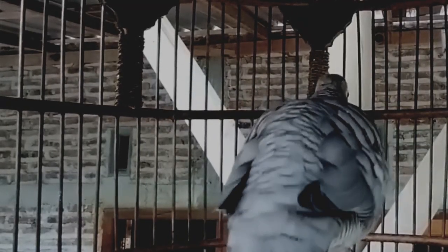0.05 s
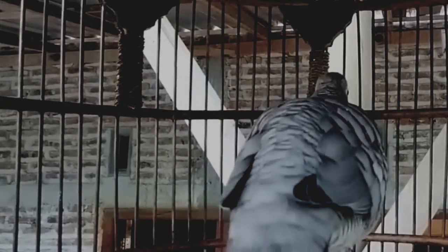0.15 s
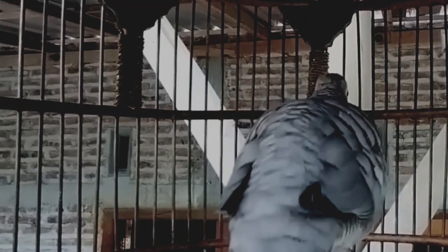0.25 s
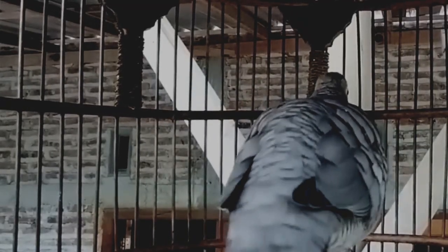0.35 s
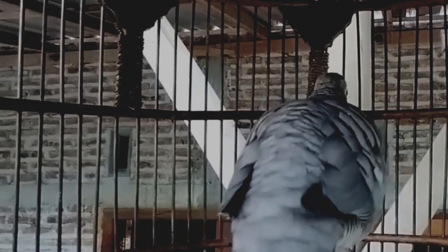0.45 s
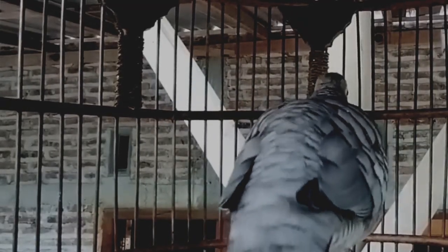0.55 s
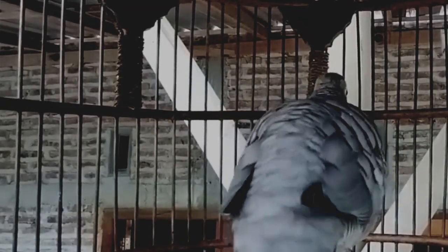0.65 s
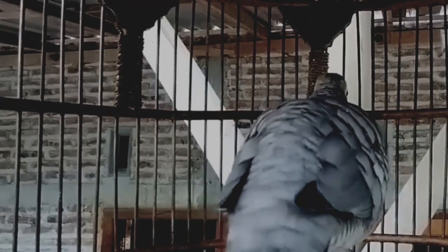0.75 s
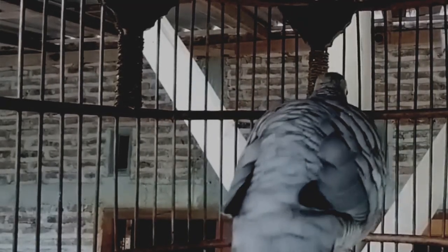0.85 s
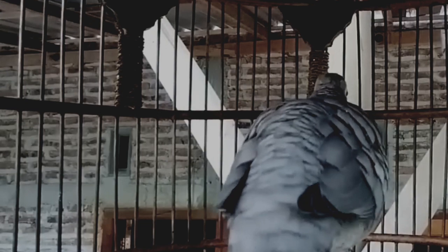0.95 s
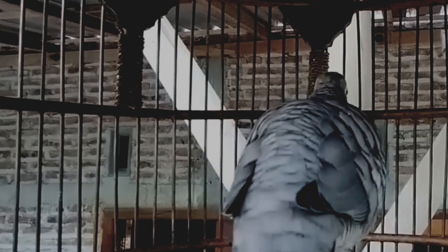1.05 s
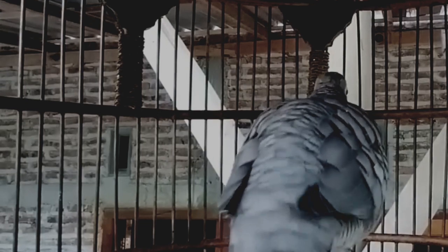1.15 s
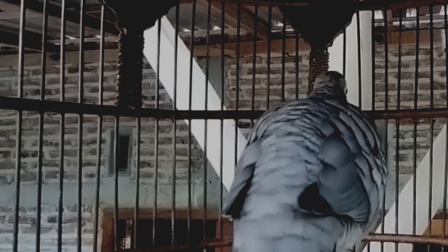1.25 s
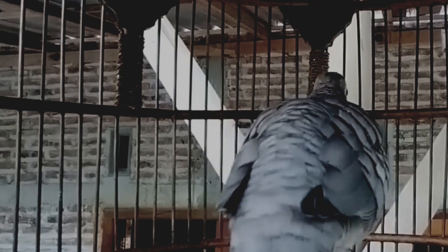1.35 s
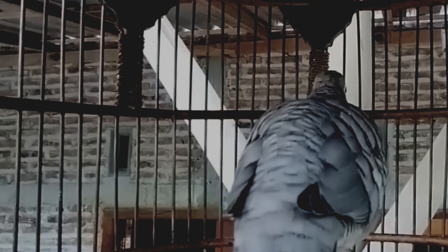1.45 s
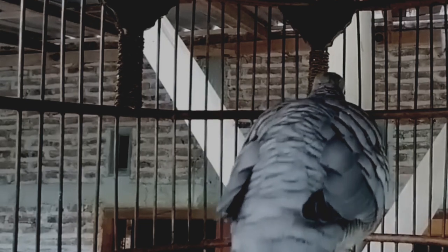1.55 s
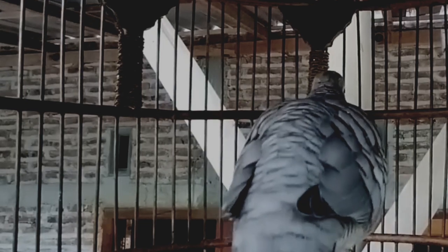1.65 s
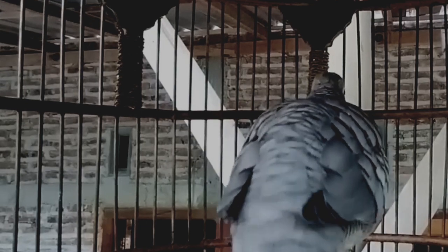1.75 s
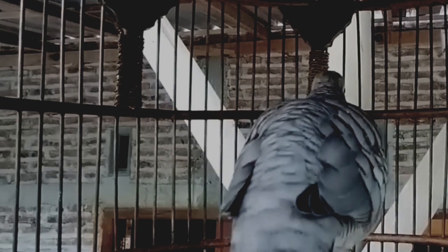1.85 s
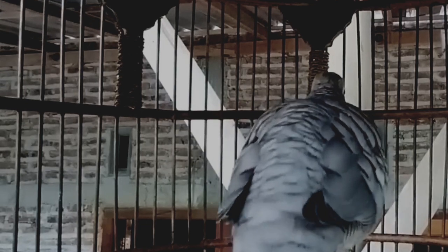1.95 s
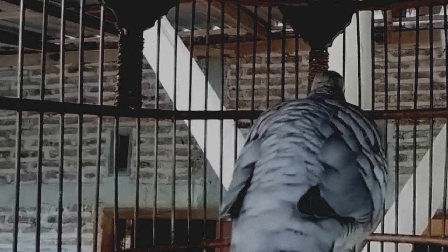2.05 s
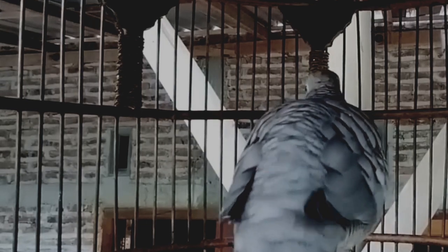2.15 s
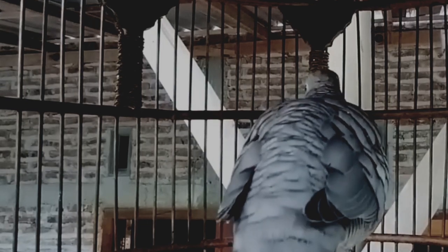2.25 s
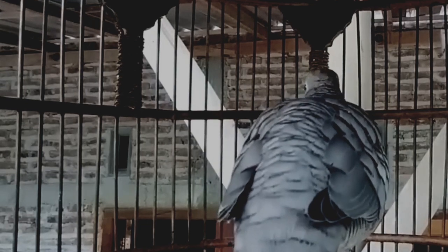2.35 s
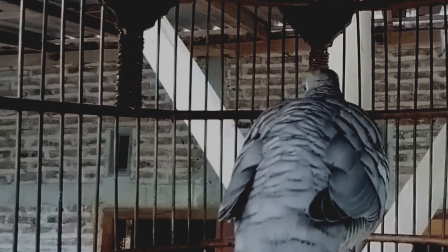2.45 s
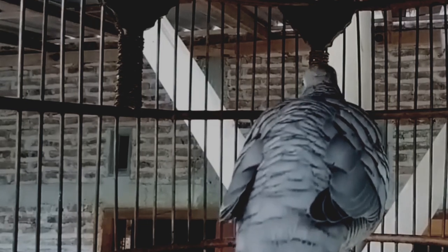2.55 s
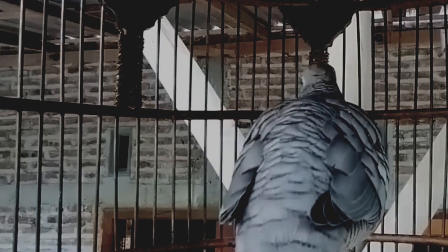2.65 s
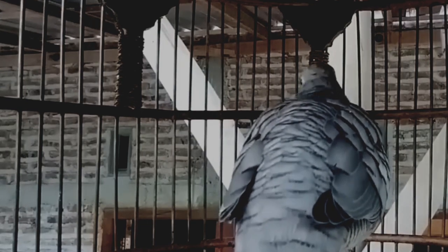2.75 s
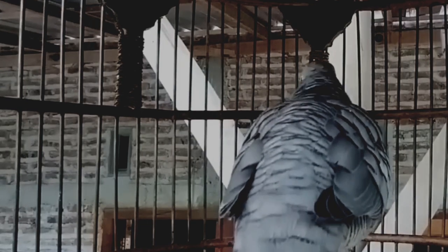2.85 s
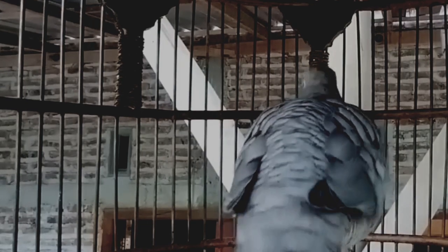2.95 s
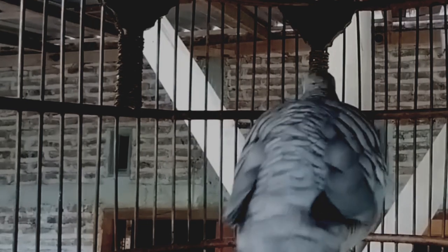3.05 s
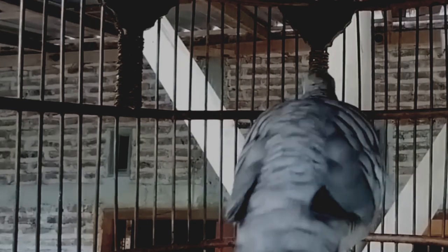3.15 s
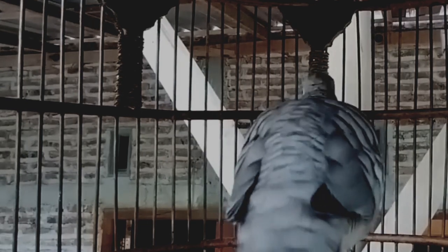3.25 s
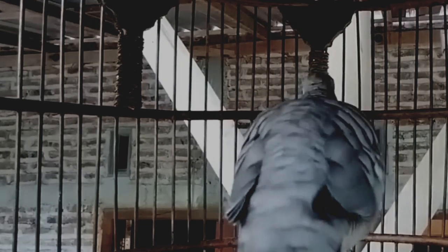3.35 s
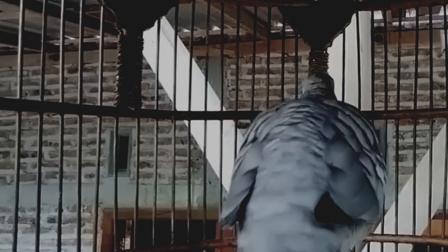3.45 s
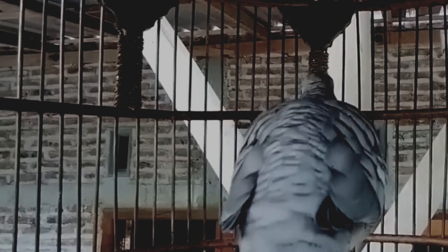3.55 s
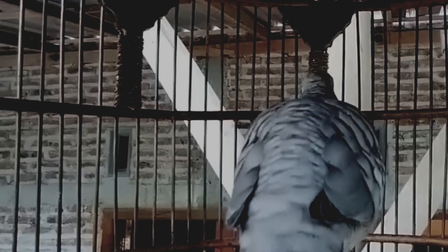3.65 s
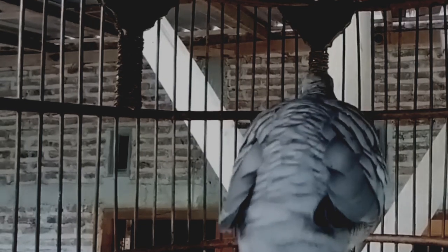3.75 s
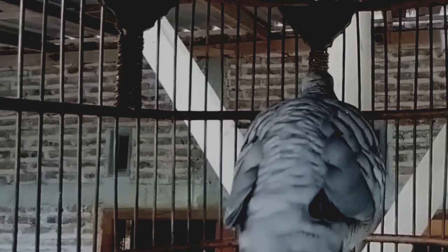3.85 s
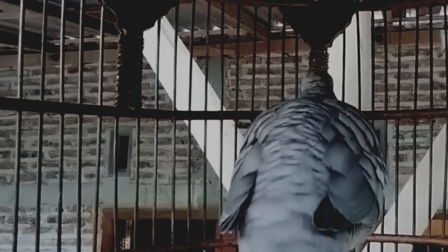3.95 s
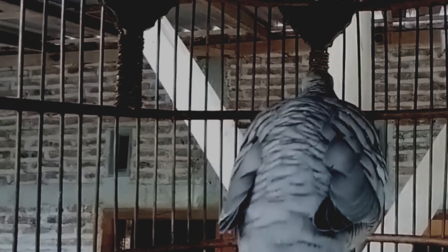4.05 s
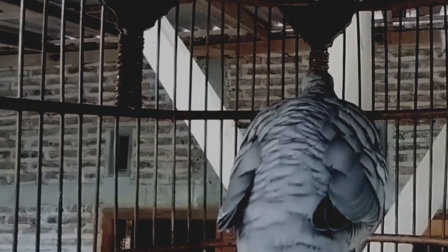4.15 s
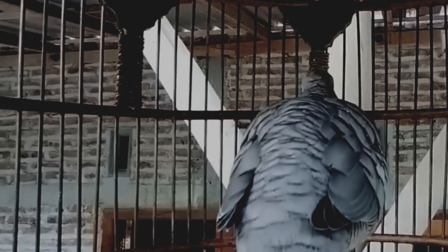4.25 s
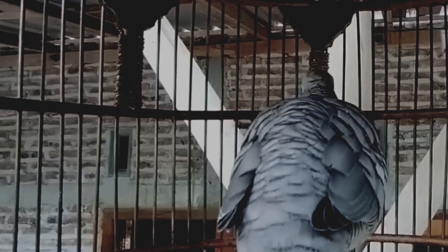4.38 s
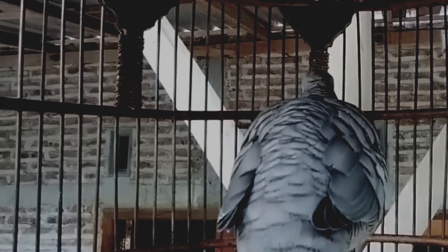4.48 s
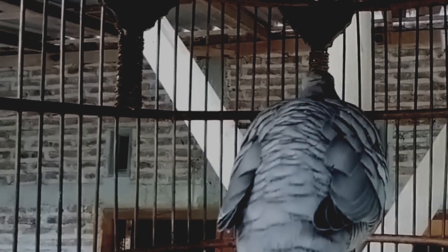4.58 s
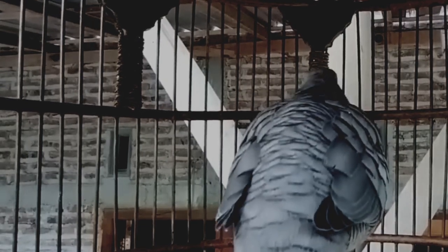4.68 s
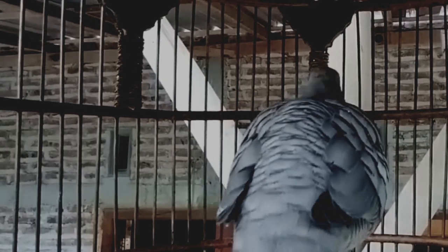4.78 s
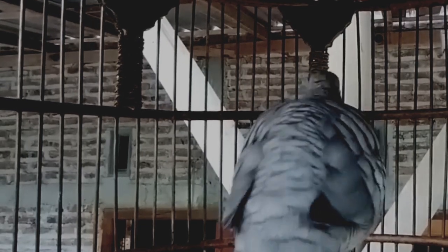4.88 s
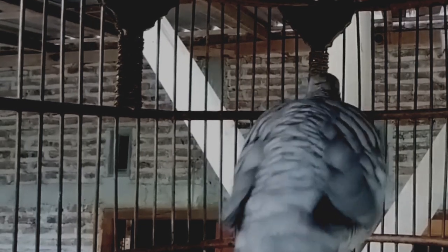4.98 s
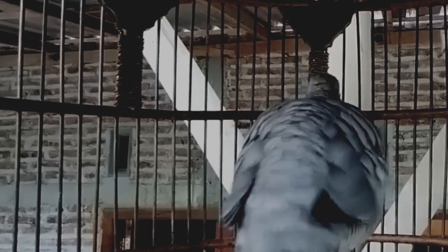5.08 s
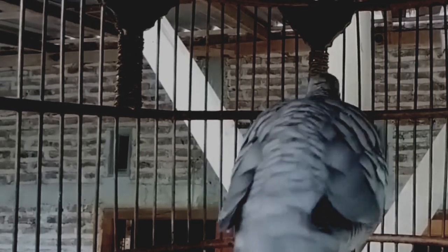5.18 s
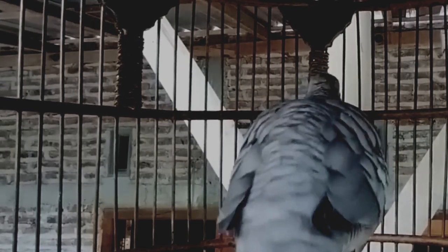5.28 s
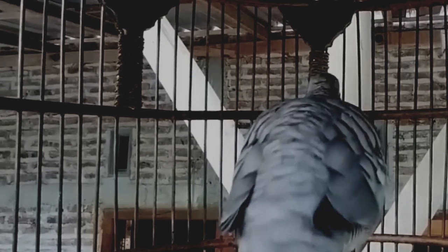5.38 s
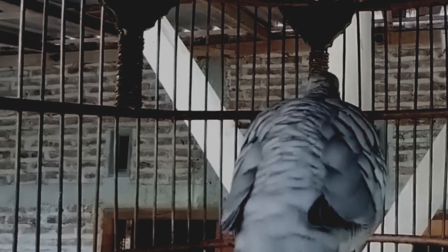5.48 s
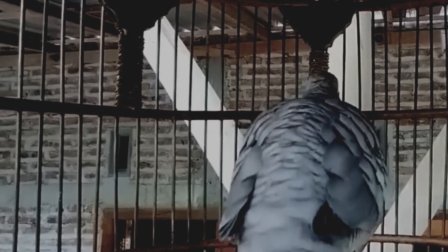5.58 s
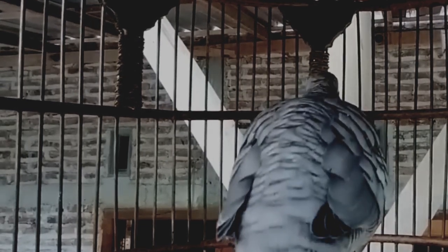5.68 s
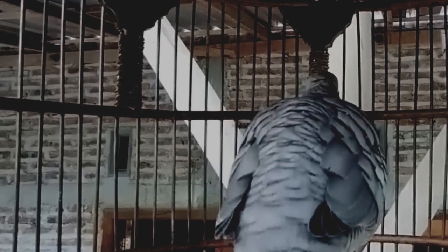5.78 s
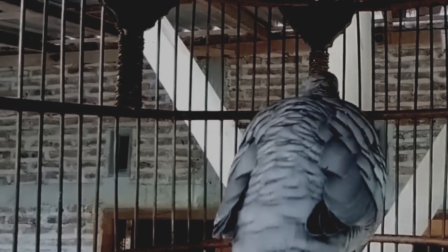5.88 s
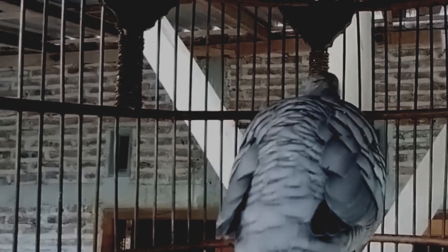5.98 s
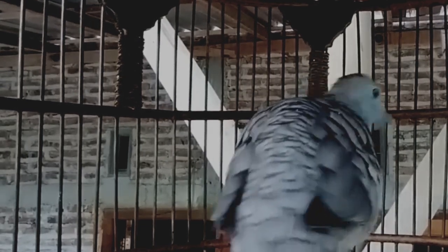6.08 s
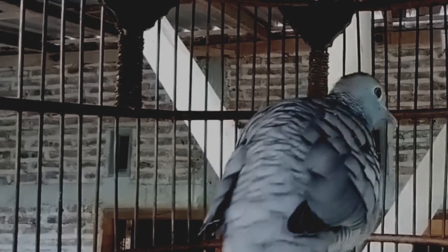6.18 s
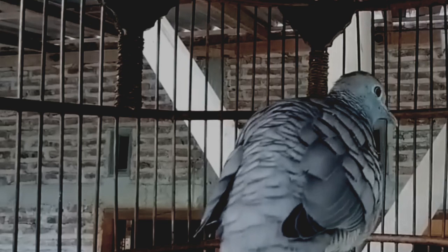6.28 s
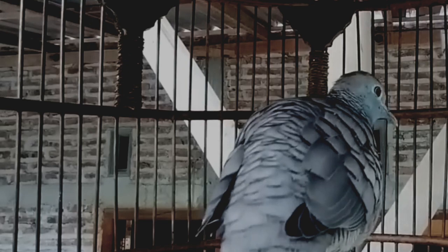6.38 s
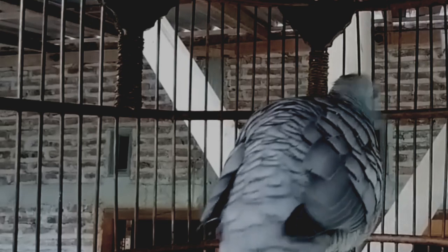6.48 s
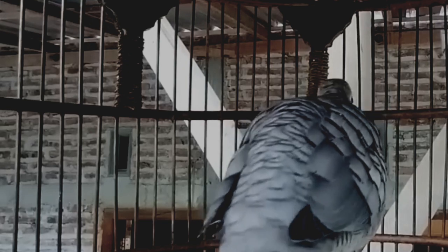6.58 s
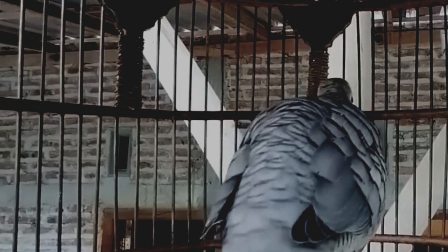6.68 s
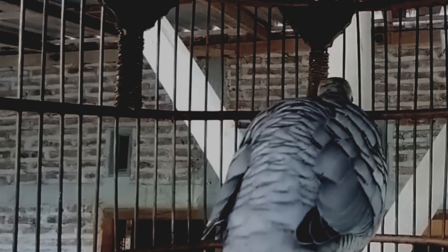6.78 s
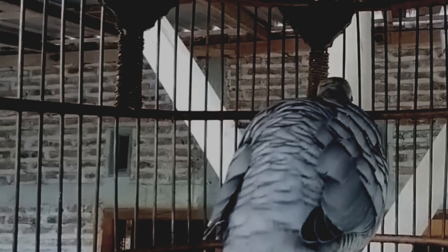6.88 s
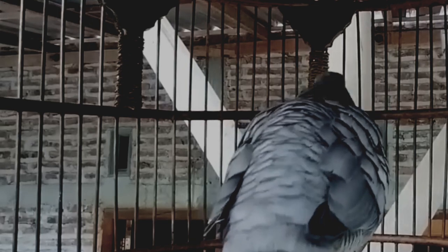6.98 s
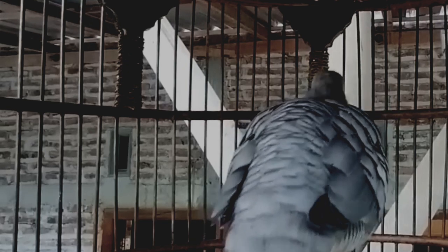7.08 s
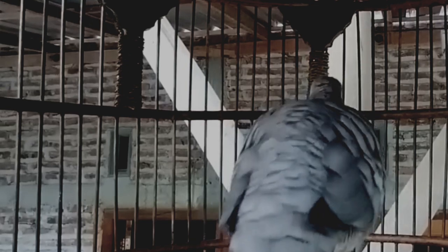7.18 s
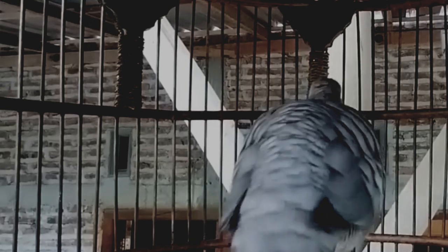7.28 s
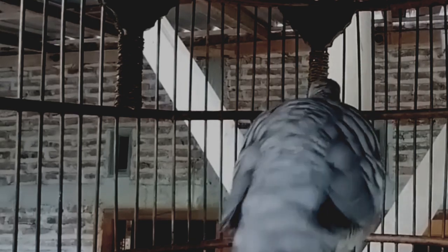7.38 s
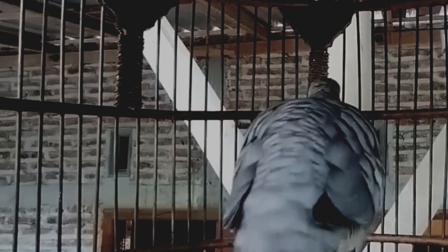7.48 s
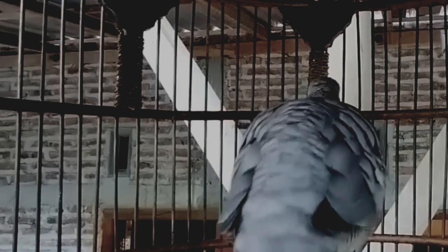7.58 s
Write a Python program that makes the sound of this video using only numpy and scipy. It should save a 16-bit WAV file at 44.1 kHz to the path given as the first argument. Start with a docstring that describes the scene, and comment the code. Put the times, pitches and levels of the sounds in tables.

```python
"""Zebra dove on a porch

A caged zebra dove coos close by, on a brick-walled porch: each coo slides up in a low register, then breaks
to a high one. Most start with a rasp of filtered puffs; delayed copies make the wall echoes.
Gliding sines chirp and whistle farther off; shaped noise gives a low outdoor rumble, hiss and insect-like trill."""
import sys
import numpy as np
from scipy import signal
from scipy.fft import rfft, irfft, next_fast_len
from scipy.io import wavfile
from scipy.ndimage import uniform_filter1d, minimum_filter1d

SR = 44100
rng = np.random.default_rng(int(sys.argv[2]) if len(sys.argv) > 2 else 0)


def wav_out(sig):
    """Save sig, one row per channel (or a flat mono array), as 16-bit PCM at SR to the path in sys.argv[1]."""
    wavfile.write(sys.argv[1], SR, np.round(np.clip(np.atleast_2d(sig).T, -1, 1) * 32767).astype(np.int16))


N = 336483
TIME_S = np.arange(N) / SR

# Slow phrase of long coos: register break t/s, hold/s
SLOW_COOS = [(.112, 0.083), (.312, 0.087), (0.517, 0.088), (0.727, 0.084), (.938, 0.086), (1.152, 0.086),
             (1.37, 0.086), (1.591, 0.087), (1.826, 0.069), (2.03, 0.079), (2.243, .089)]
SLOW_TOP_HZ, SLOW_SINK_HZ = 1214.6, 40.13
SLOW_PEAK_DB, SLOW_ARCH_DB = -1.2, 6.5
SLOW_SLIDE_S, SLOW_SLIDE_GROWTH_S, SLOW_RASP_S = .023, .01, .013
SLOW_LOW_REGISTER = .805  # pitch under the break / top pitch
SLOW_FADE_S, SLOW_LAST_FADE_S = .016, .055
# Trills: list of register breaks t/s, pitch offset/Hz, quaver depth of long notes/0-1
TRILLS = [([3.128, 3.182, 3.237, 3.324, 3.421, 3.530, 3.650, 3.800, 3.998], 0, 0.73),
          ([4.981, 5.031, 5.082, 5.155, 5.256, 5.366, 5.491, 5.638], 1, .1),
          ([7.294, 7.335, 7.381, 7.442, 7.541], 26, 0)]
# Course of every trill: t into trill/s, slide/s, hold/s, fade/s, top f/Hz, level/dB, rasp/s
TRILL_COURSE = [(0, .024, .035, .031, 1206, -2, .024), (.05, .012, 0.033, .026, 1188, -5, .005),
                (0.177, .014, .033, 0.032, 1145, -4, .008), (.52, .021, 0.046, .045, 1164, -3.5, .011),
                (0.661, .023, .098, .08, 1166, -4, .016)]
TRILL_LOW_HZ = 970.2  # under the break, before the trill's offset
QUAVER_PER_S = 24
# Soft coos without rasp: register break t/s, slide/s, hold/s, top f/Hz
SOFT_COOS = [(0.219, .028, .075, 1228), (4.156, .027, .041, 1253), (4.346, 0.048, 0.062, 1272)]
SOFT_DB, SOFT_LOW_REGISTER, SOFT_FADE_S = -13.5, .885, .009
# Low-register slide: t before the break/slide length, f/pitch under the break
SLIDE = [(-.3, 1.3), (0, 1.04), (.15, 0.995), (.5, 0.9817), (.8, 0.9244), (1, 0.842), (1.3, .52)]
# High-register overtones: multiple of f, level/dB
OVERTONES = [(3, -44.5), (4, -52.5), (5, -46.5), (6, -53.5)]
# Soft short notes, pitch a parabola: t/s, length/s, start f/Hz, middle f/Hz, end f/Hz
MURMURS = [(.420, 0.038, 960, 1161, 1046), (3.732, 0.073, 967, 1112, 1165), (3.935, 0.029, 993, 1106, 1105),
           (7.469, 0.02, 1160, 1268, 1315), (7.487, .04, 1098, 1140, 1206), (7.614, .04, 980, 1080, 1070)]
# Soft throat clicks before a trill: t/s
CLICKS_S = [3.039, 4.899, 7.205]
# Hiss that follows the coo's loudness: f/Hz, relative level/dB per Hz
HISS_WITH_COO = [(1500, -1.5), (2500, 1.5), (3400, -1), (4500, -6.5), (6200, -1), (8000, -10), (11000, -14),
                 (15000, -12)]
# Near walls: delay/s, left gain, right gain (negative inverts the wave)
WALLS = [(.00196, -.28, -.05), (.00391, .15, -.12), (.00464, -.05, -.13), (.00963, .2, -.03),
         (.0102, -.01, .19), (.0162, -.15, -.23), (.0166, -.03, -.11), (.0357, -0.029, -.09),
         (.0386, -.07, -.07)]

# Tick: t/s, level of the noise before its band-pass/dB
TICK = (5.129, -30)

# Glide shapes, whistle (short step, then sweep up), chirp, peep, arch: t into call/s, f/Hz, relative level/dB
WHISTLE_SHAPE = [(0, 4300, -21.5), (.022, 4970, -10.5), (.038, 5080, -22.5), (.05, 5250, -11),
                 (.11, 5575, -8.5), (.15, 6400, -1.5), (.175, 7140, -5.5), (.2, 7506, -11.5),
                 (.21, 7570, -38.5)]
CHIRP_SHAPE = [(0, 3599, -15), (.008, 4596, -2), (.016, 4810, 0.5), (.05, 4800, -2), (.056, 3835, -13),
               (.075, 3150, 0.5), (.105, 2680, -1), (.13, 2502, -19)]
PEEP_SHAPE = [(0, 2489, -17.5), (.02, 2661, 3.5), (.04, 2780, -2.5), (.06, 2680, -22.5)]
ARCH_SHAPE = [(0, 2720, -13.5), (.03, 3240, -4.5), (.06, 3530, 0), (.1, 3100, -1), (.12, 2890, -17)]
# The whistler's calls: t/s, level/dB
WHISTLES = [(0.093, -34.5), (4.234, -35.5), (6.825, -38)]
# Bouts of steady chirps: first t/s, last t/s
CHIRP_BOUTS = [(.45, 1.559), (1.775, 3.615), (3.985, 5.135), (5.491, 7.315)]
CHIRP_EVERY_S, CHIRP_DB = .37, -51  # approximate spacing
# Peeps: t/s
PEEP_TIMES_S = [2.67, 2.73, 3.03, 5.79, 6.255, 6.718]
PEEP_DB = -48.5
# Arched calls: t/s
ARCH_TIMES_S = [.05, .72, 2.675, 3.09, 4.57, 6.05, 6.511, 6.98]
ARCH_DB = -53.5
# Hoarse chips: centre t/s, half-length/s, level/dB
CHIPS = [(2.384, 0.089, -51), (2.88, 0.037, -42.5), (3.68, 0.083, -51.5), (4.224, 0.077, -52),
         (6.469, .12, -55.5)]

# One far hoot: t/s, f/Hz, level/dB
HOOT = [(2.1, 592, -61), (2.3, 623, -48), (2.45, 640, -40.5), (2.6, 625, -56), (2.72, 604, -67)]
# Another dove answers far away: t/s, f/Hz, level/dB
ANSWER = [(6.575, 948, -49), (6.62, 1205, -45), (6.72, 1165, -51), (6.79, 1100, -45), (6.81, 1038, -66),
          (6.835, 1025, -40), (6.86, 988, -71), (6.885, 1000, -48), (6.92, 980, -70), (6.955, 998, -49.5),
          (7.0, 1010, -68), (7.05, 1127, -43.5), (7.1, 987, -66)]
# Outdoor rumble: f/Hz, relative level/dB per Hz
RUMBLE_SPECTRUM = [(22, -9), (40, -4.5), (58, -3), (78, -0.5), (112, -10.5), (200, -13.5), (300, -14),
                   (400, -19.5), (500, -25), (650, -27), (850, -32.5), (1150, -32.5), (1400, -38.5),
                   (2000, -42.5), (2600, -53.5)]
RUMBLE_DB = -36.5
# Outdoor hiss: f/Hz, relative level/dB per Hz
HISS_SPECTRUM = [(1500, -4), (2200, 2), (3200, 1), (4200, -0.5), (6300, -2), (7500, -7), (9500, 1),
                 (10400, -6.5), (11300, -16), (13000, -8), (15500, -12.5)]
# Stereo noise: f/Hz, left-right likeness
LIKENESS = [(30, 0.22), (70, .94), (250, 0.88), (900, 0.6), (2200, 0), (15000, 0.021)]
CUTOFF_HZ = 15500


def dove(voice_db=-3, murmur_db=-11.5, rasp_db=24.0, click_db=3, low_octave_db=-40, high_octave_db=-48.5,
         hiss_with_coo_db=-50, ear_lag_s=.00018):
    """Nearly pure notes from an inflated throat, with faint overtones and hiss, echoed by the porch."""
    tone, overtones, puffs, coo_loudness = np.zeros((4, N))
    for s, slide_s, rasp_s, db, (lead_s, phase, loud) in [*slow_phrase(), *trills(), *soft_coos()]:
        loud = loud * from_db(db)
        size = loud.shape[1]
        # octave strongest in the low register
        octave = from_db(np.array([[low_octave_db], [high_octave_db]]) + 2.7 * drift(120, size))
        voiced = np.sin(phase) + octave * np.sin(2 * phase)
        add(tone, s + lead_s, np.sum(loud * voiced, axis=0))
        series = sum(from_db(level_db + 3.4 * drift(170, size)) * np.sin(multiple * phase[1])
                     for multiple, level_db in OVERTONES)
        # overtones grow faster than the note's loudness
        add(overtones, s + lead_s, loud[1] ** 1.3 * series)
        add(coo_loudness, s + lead_s, loud.sum(axis=0))
        if rasp_s > 0:
            add(puffs, s - slide_s - rasp_s, from_db(db + rasp_db) * rasp(rasp_s + .002))
    for s, length_s, start_hz, middle_hz, end_hz in MURMURS:
        add(tone, s, from_db(murmur_db) * murmur(length_s, start_hz, middle_hz, end_hz))
    for s in CLICKS_S:
        add(puffs, s, from_db([click_db]))
    # puffs ring in the closed throat
    throat = band(band(puffs, 870, 1400, order=1), 480, 1385, order=5)
    voice = from_db(voice_db) * (tone + throat)
    near = voice * from_db([[1.1], [-1.2]]) + wall_echoes(voice)
    bright = np.array([overtones, delayed(overtones, ear_lag_s)])
    porch = from_db(-18.5) * reverb(band(voice, 850, 1060), t60_s=0.6)
    porch = porch + from_db(-26.0) * reverb(voice, t60_s=0.2)
    hiss = from_db(hiss_with_coo_db) * coo_loudness * noise(HISS_WITH_COO)
    return near + bright + porch + hiss


def slow_phrase():
    """As the bird tires, coos sink, slide longer, fade longer. Yields (s, slide s, rasp s, dB, note)."""
    for (s, hold_s), tired in zip(SLOW_COOS, np.linspace(0, 1, len(SLOW_COOS))):
        top_hz = SLOW_TOP_HZ - SLOW_SINK_HZ * tired ** 2.6
        slide_s = SLOW_SLIDE_S + SLOW_SLIDE_GROWTH_S * tired
        fade_s = SLOW_FADE_S + (SLOW_LAST_FADE_S - SLOW_FADE_S) * tired ** 4.7
        db = SLOW_PEAK_DB - SLOW_ARCH_DB * (tired - .47) ** 2  # loudest near the middle
        yield s, slide_s, SLOW_RASP_S, db, coo(slide_s, hold_s, fade_s, SLOW_LOW_REGISTER * top_hz, top_hz)


def trills():
    """Each note takes its shape from how far into the trill it falls; long notes may quaver."""
    ages_s, *columns = np.transpose(TRILL_COURSE)
    for times_s, offset_hz, quaver in TRILLS:
        for s in times_s:
            slide_s, hold_s, fade_s, top_hz, db, rasp_s = (
                np.interp(s - times_s[0], ages_s, c) for c in columns)
            lead_s, phase, loud = coo(slide_s, hold_s, fade_s, TRILL_LOW_HZ + offset_hz, top_hz + offset_hz,
                                      accent_db=2.5)
            if hold_s > 2 / QUAVER_PER_S:
                cycles = QUAVER_PER_S * (lead_s + np.arange(loud.shape[1]) / SR)
                dips = (cycles > .5) * np.cos(np.pi * (cycles + .13)) ** 8
                loud = loud * (1 - quaver * dips)
            yield s, slide_s, rasp_s, db, (lead_s, phase, loud)


def soft_coos():
    """With little pressure the break is small and the top of the note droops."""
    for s, slide_s, hold_s, top_hz in SOFT_COOS:
        note = coo(slide_s, hold_s, SOFT_FADE_S, SOFT_LOW_REGISTER * top_hz, top_hz, droop=0.13, crest=.25,
                   sag=.15, sag_s=.014, leap=0.022, low_db=1.5)
        yield s, slide_s, 0, SOFT_DB, note


def coo(slide_s, hold_s, fade_s, low_hz, top_hz, droop=.08, crest=.36, sag=.08, sag_s=.011, catch_s=0.0046,
        leap=.06, leap_s=0.0013, linger_s=0.011, low_db=1.39, shimmer_db=0.73, accent_db=0.,
        accent_s=0.0047):
    """Phase and loudness rows (low, high): the low register slides up and lingers, beating with the high one,
    which leaps in sharp, arches and sags as the air runs out."""
    u = np.arange(-1.3 * slide_s, hold_s, 1 / SR)  # s from the break
    since = np.maximum(u + catch_s / 2, 0)
    low = low_hz * np.interp(-u / slide_s, *np.transpose(SLIDE))
    sharp = leap * np.exp(-(since / (2 * leap_s)) ** 2)
    arch = droop * (u / hold_s - crest) ** 2
    high = top_hz * (1 + sharp - arch - sag * ease(1 - (hold_s - u) / sag_s))
    phase = np.array([phase_of(hz * (1 + .004 * drift(300, len(u)))) for hz in (low, high)])
    swell = ease((u - u[0]) / slide_s) * (1 - ease(since / linger_s)) ** 2
    release = np.sin(np.pi / 2 * np.clip((hold_s - u) / fade_s, 0, 1)) ** 1.09
    accent = from_db(accent_db * np.exp(-(since / accent_s) ** 2))  # pressure peaks at the break
    loud = np.array([swell * from_db(low_db), ease(since / catch_s) * release * accent])
    return u[0], phase, loud * from_db(shimmer_db * drift(120, len(u)))


def rasp(length_s, pulse_hz=310, jitter=.16, growth_db=10):
    """Separate, growing puffs of the syrinx before the tone catches."""
    chance = rng.standard_normal((16, 2))
    at_s = np.cumsum(np.exp(jitter * chance[:, 0])) / pulse_hz - 1 / pulse_hz / 2
    puffs = np.zeros(round(length_s * SR) + 1)
    heard = at_s < length_s
    puff_db = growth_db * (at_s[heard] / length_s - 1) + 2 * chance[heard, 1]
    puffs[(at_s[heard] * SR).astype(int)] = from_db(puff_db)
    return puffs


def murmur(length_s, start_hz, middle_hz, end_hz):
    """A short sine whose pitch follows a parabola through three points."""
    p = np.linspace(0, 1, round(length_s * SR))
    hz = np.polyval(np.polyfit([0, .5, 1], [start_hz, middle_hz, end_hz], 2), p)
    return ease(p / 0.16) * ease((1 - p) / .15) * np.sin(phase_of(hz))


def wall_echoes(voice):
    """Early reflections: delayed copies with a gain per ear."""
    return sum(delayed(voice, s) * np.array([[left], [right]]) for s, left, right in WALLS)


def tick(t60_s=0.013):
    """A brief bright snap: decaying band-passed noise."""
    s, db = TICK
    age_s = np.maximum(TIME_S - s, 0)
    envelope = from_db(db - 60 * age_s / t60_s) * (age_s > 0)
    return envelope * band(rng.standard_normal((2, N)), 3000, 11000)


def small_birds():
    """Gliding-sine whistles from the right and centred chirps; noise-burst chips heard only as reverb."""
    whistles = calls(WHISTLE_SHAPE, WHISTLES, vary=0.0075, waver=0.007)
    paced = [(s, CHIRP_DB) for first_s, last_s in CHIRP_BOUTS
             for s in np.linspace(first_s, last_s, round((last_s - first_s) / CHIRP_EVERY_S) + 1)]
    chirps = calls(CHIRP_SHAPE, paced, vary=.004, waver=.005)
    chirps = chirps + calls(PEEP_SHAPE, [(s, PEEP_DB) for s in PEEP_TIMES_S])
    chirps = chirps + calls(ARCH_SHAPE, [(s, ARCH_DB) for s in ARCH_TIMES_S])
    bursts = sum(from_db(db) * ease(1 - abs(TIME_S - s) / half_s) for s, half_s, db in CHIPS)
    chips = bursts * rms_one(band(rng.standard_normal(N), 5200, 6400))
    right = (whistles + from_db(-3.0) * reverb(whistles, t60_s=0.49)) * from_db([[-6], [2]])
    return right + chirps + from_db(-3) * reverb(chirps, t60_s=0.55) + reverb(chips, t60_s=.15)


def calls(shape, times, vary=0.014, waver=0.0042, flutter_db=3.5, pitch_share=1):
    """One bird repeats its glide, a little different each time."""
    out = np.zeros(N)
    s, hz, db = np.transpose(shape)
    t = np.arange(0, s[-1], 1 / SR)
    for start_s, level_db in times:
        share = pitch_share + vary * rng.standard_normal() + waver * drift(400, len(t))
        loud = from_db(level_db + np.interp(t, s, db) + flutter_db * drift(150, len(t)))
        add(out, start_s, loud * np.sin(phase_of(np.interp(t, s, hz) * share)))
    return out


def twitter(level_db=-57, count=36):
    """Far birds warble gliding sines at random moments and pitches, most busily early on."""
    times = [(7.5 * when ** 1.5, level_db + 3 * (2 * size - 1)) for when, size in rng.random((count, 2))]
    warbles = calls(PEEP_SHAPE, times, vary=0.088, waver=0.07, pitch_share=1.1)
    return warbles + reverb(warbles, t60_s=0.23)


def yard(hiss_db=-54.5, chatter_db=-66, insect_db=-67):
    """Noise bands as rumble, hiss, far bird chatter and a thin insect-like trill; two distant calls."""
    chatter = rms_one(band(rng.standard_normal((2, N)), 2550, 3700, order=3))
    chatter = from_db(chatter_db + 7 * drift(14, N)) * chatter
    insect = rms_one(band(rng.standard_normal((2, N)), 6400, 6580))
    insect = from_db(insect_db + 7.3 * drift(20, N)) * insect * from_db([[-4], [2]])
    steady = from_db(RUMBLE_DB) * noise(RUMBLE_SPECTRUM) + from_db(hiss_db) * noise(HISS_SPECTRUM)
    return steady + chatter + insect + far_call(HOOT) + far_call(ANSWER)


def far_call(rows, waver_hz=5):
    """A soft sine from a distant bird, wavering in pitch and level."""
    s, hz, db = np.transpose(rows)
    loud = from_db(np.interp(TIME_S, s, db, left=-np.inf, right=-np.inf) + 2 * drift(28, N))
    return loud * np.sin(phase_of(np.interp(TIME_S, s, hz) + waver_hz * drift(55, N)))


def noise(spectrum):
    """Stereo noise of a given colour, its left-right likeness set by frequency; overall rms 1."""
    size = next_fast_len(N)
    hz = np.maximum(np.arange(size // 2 + 1) * SR / size, 1)

    def at_hz(rows, **ends):
        row_hz, values = np.transpose(rows)
        return np.interp(np.log(hz), np.log(row_hz), values, **ends)

    alike = np.clip(at_hz(LIKENESS), -1, 1)
    colour = from_db(at_hz(spectrum, left=-np.inf, right=-np.inf))
    mid, side = rfft(rng.standard_normal((2, size))) * colour
    stereo = np.sqrt(1 + alike) * mid + np.sqrt(1 - alike) * side * [[1], [-1]]
    return rms_one(irfft(stereo, size)[:, :N])


def reverb(x, t60_s):
    """Diffuse, dying reflections, different in each ear."""
    t = np.arange(SR) / SR
    tail = rng.standard_normal((2, SR)) * from_db(-60 * t / t60_s) * ease(t / 0.013)
    tail = tail / np.sqrt(np.sum(tail ** 2, axis=1, keepdims=True))
    return signal.fftconvolve(x[None], tail, axes=1)[:, :N]


def delayed(x, s):
    """The same sound, s seconds later."""
    return np.interp(TIME_S - s, TIME_S, x, left=0)


def band(x, low_hz, high_hz, order=2):
    """Butterworth band-pass."""
    sos = signal.butter(order, [low_hz, min(high_hz, .49 * SR)], "band", fs=SR, output="sos")
    return signal.sosfilt(sos, x + 1e-18)


def drift(rate_hz, size):
    """Random values of unit spread about 0, drawn at rate_hz and joined by lines."""
    return np.interp(np.arange(size) * rate_hz / SR, np.arange(4096), rng.standard_normal(4096))


def phase_of(hz):
    """Running phase of a gliding tone."""
    return 2 * np.pi * np.cumsum(hz) / SR


def add(out, start_s, sound):
    """Mix a sound into a track."""
    at = round(start_s * SR) + np.arange(len(sound))
    inside = (at >= 0) & (at < N)
    out[at[inside]] += sound[inside]


def from_db(db):
    """Decibels to amplitude."""
    return 10 ** (np.asarray(db) / 20)


def rms_one(x):
    """Scale to rms 1."""
    return x / np.sqrt(np.mean(x ** 2) + 1e-20)


def ease(x):
    """A smooth step from 0 to 1."""
    return np.sin(np.pi / 2 * np.clip(x, 0, 1)) ** 2


def scene():
    """The dove in front, the yard behind."""
    return dove() + tick() + small_birds() + twitter() + yard()


def record(dry):
    """A limiter holds peaks to full scale; a steep low-pass then cuts the top."""
    room_left = 1 / np.maximum(np.abs(dry).max(axis=0), 1)
    gain = uniform_filter1d(minimum_filter1d(room_left, size=221), size=221)
    low_pass = signal.ellip(10, .1, 80, CUTOFF_HZ, fs=SR, output="sos")
    return signal.sosfilt(low_pass, dry * gain)


dry = scene()
out = record(dry)
wav_out(out)
```